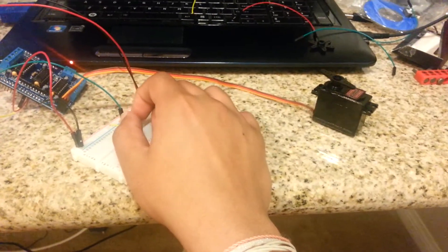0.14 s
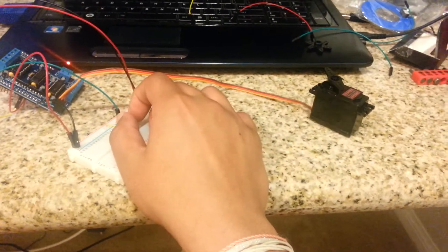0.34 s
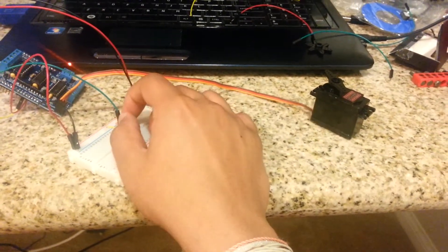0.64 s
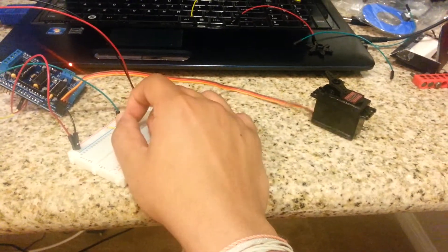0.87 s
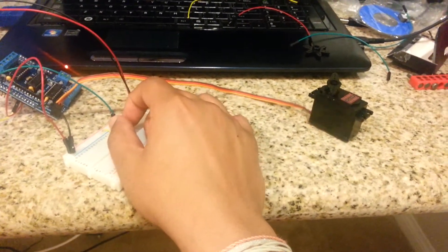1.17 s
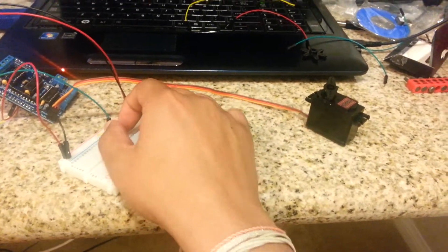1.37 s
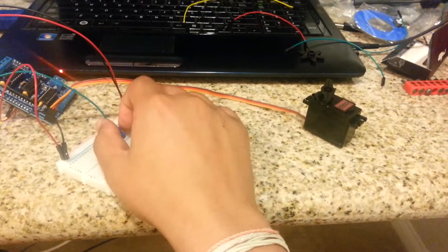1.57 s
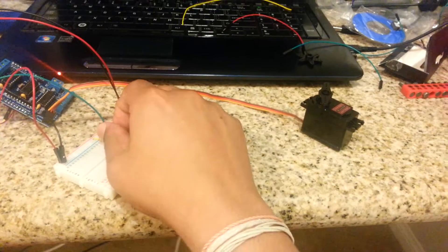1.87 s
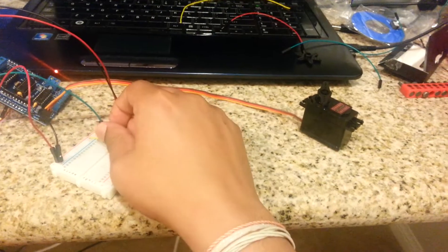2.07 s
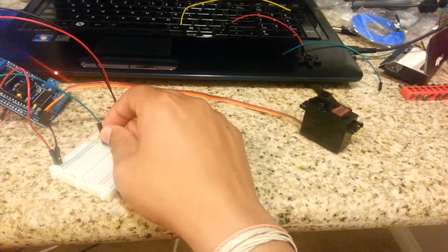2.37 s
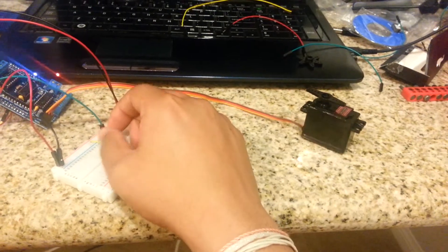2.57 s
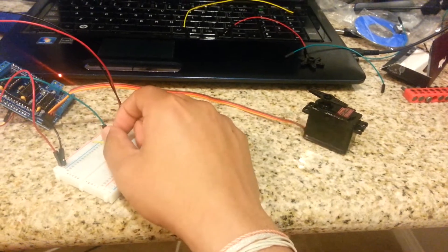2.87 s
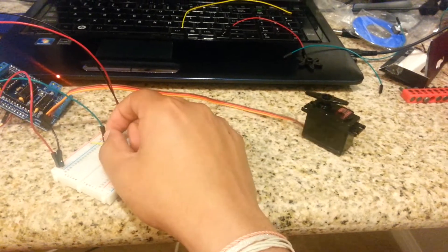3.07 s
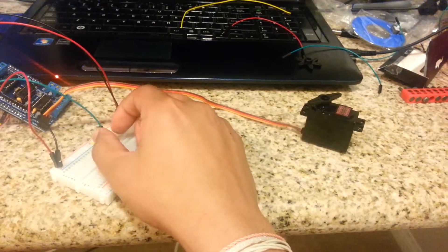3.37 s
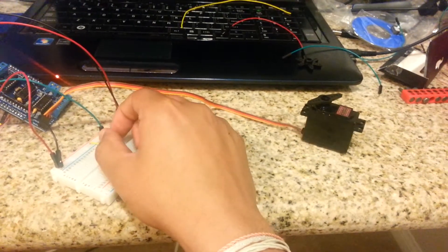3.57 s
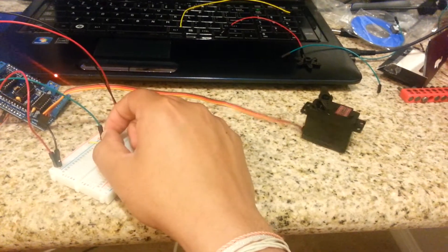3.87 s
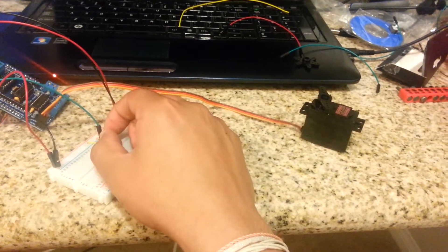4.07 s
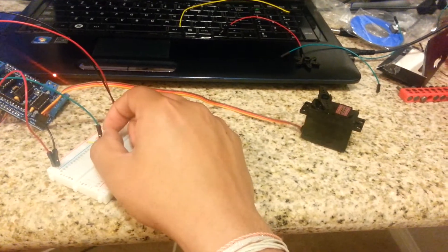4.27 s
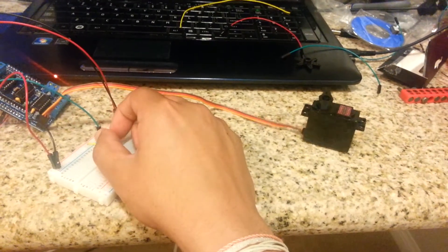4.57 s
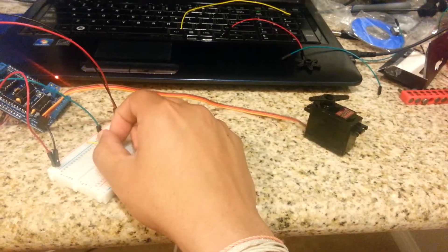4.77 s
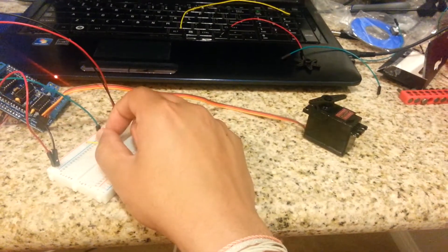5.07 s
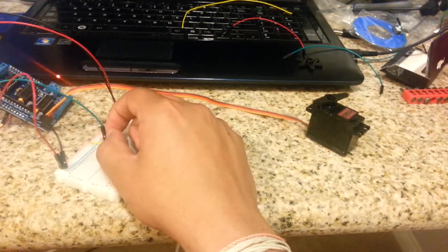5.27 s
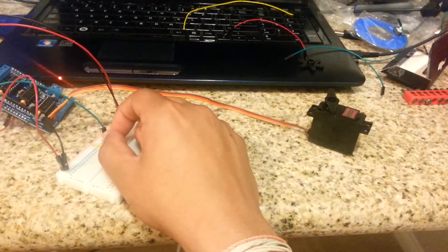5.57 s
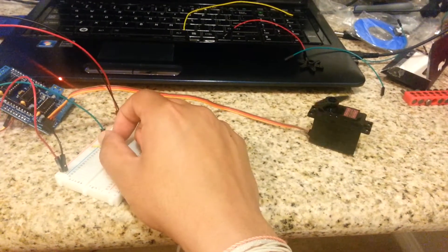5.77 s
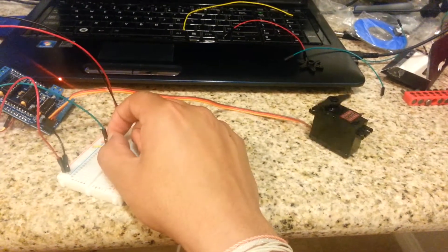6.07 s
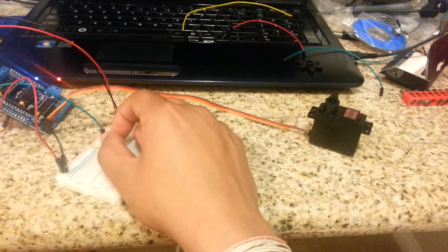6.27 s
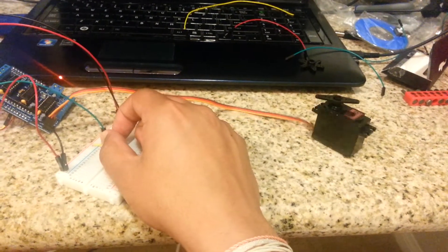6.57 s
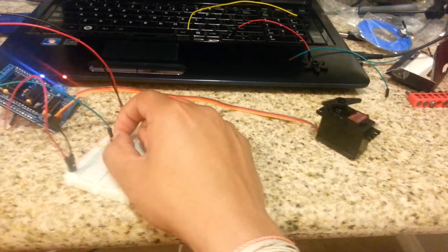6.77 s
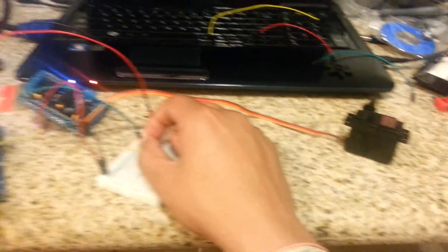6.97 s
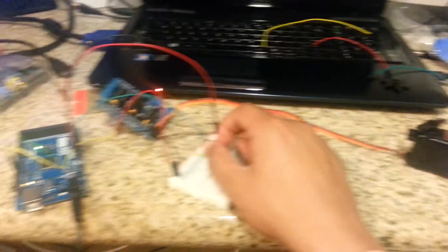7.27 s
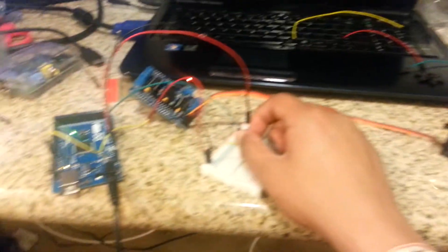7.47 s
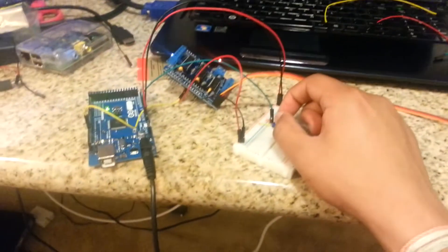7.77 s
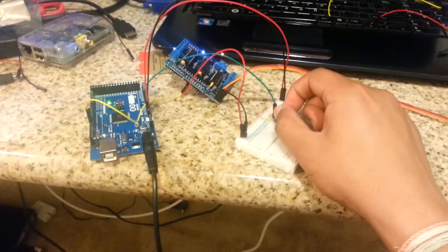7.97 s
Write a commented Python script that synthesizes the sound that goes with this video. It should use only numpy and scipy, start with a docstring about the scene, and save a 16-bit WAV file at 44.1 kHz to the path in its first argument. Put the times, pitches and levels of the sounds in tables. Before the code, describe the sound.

A small hobby servo sits close on a stone counter, right of a two-channel phone microphone. Already whirring faintly, it soon makes a dozen quick buzzing moves, each spinning up, whining through rattling plastic gears and braking. Dull ticks, faint creeping grinds and tiny case knocks fill the gaps. A steady, soft laptop fan hum lies behind in a small, dull room.

```python
"""A hobby servo, already whirring faintly, is heard first; it swings to and fro in short bursts over a fan hum.
It sits on a stone kitchen counter, close to the right of a phone with two microphone ports, in a small room.
Its motor spins up and brakes while gear teeth whine and rattle in the plastic case. Between moves, drive
pulses tick the gears and the case rocks on the stone. Behind it a laptop fan is made of shaped noise and
wavering tones. The servo is built from tooth impacts timed by the rotor and passed through case resonances."""
import sys
import numpy as np
from scipy import signal
from scipy.fft import rfft, irfft, next_fast_len
from scipy.io import wavfile
from scipy.ndimage import uniform_filter1d

SR = 44100
rng = np.random.default_rng(int(sys.argv[2]) if len(sys.argv) > 2 else 0)


def wrap_up_sound(samples):
    """Save the sound to the file named by the first command line argument, as 16-bit audio."""
    columns = np.atleast_2d(samples).T
    # keep every value between -1 and 1, then stretch to whole-number steps
    tamed = np.clip(columns, -1, 1)
    steps = np.round(tamed * 32767).astype(np.int16)
    wavfile.write(sys.argv[1], SR, steps)


N = 358533
TIME = np.arange(N) / SR

# All levels are relative, ahead of the later mix gains.
# room tone, spectral density: (f/Hz, level/dB)
AIR_COLOUR = [(15, -32), (25, -32), (109, -5.5), (293, -7), (363, -11), (404, -12), (769, -15.5), (856, -8),
              (952, -17.5), (1030, -10.5), (1150, -25.5), (1240, -18), (2370, -26.5), (10600, -33),
              (15000, -27.5)]
# laptop fan tones: (f/Hz, level/dB)
FAN_TONES = [(102.3, -88), (678.3, -79.5), (845.2, -71.5), (1017, -72), (1475, -79)]
# plastic on stone: (f/Hz, level/dB)
KNOCK_COLOUR = [(100, -22), (300, -10), (550, -9), (900, -2), (1700, 0), (3000, -6), (6000, -15),
                (15000, -32)]
# the case rocking on the stone: (t/s, peak level/dB)
KNOCKS = [(1.063, -35), (3.329, -36.5), (3.343, -41), (4.754, -29.5), (5.876, -33.5), (6.543, -33.5),
          (7.424, -32.5), (7.597, -39)]
# the dull push of one drive pulse: (f/Hz, level/dB)
PUSH_COLOUR = [(200, -26), (800, -16), (1500, 2), (2300, 0), (3300, -2), (4500, -12), (8000, -32),
               (15000, -29)]
# runs of drive pulses taking up the gear play: (start t/s, pulse count, peak level/dB, treble level/dB)
TICKS = [(0.428, 1, -31, -12), (.8875, 1, -28, -4.5), (1.1114, 1, -41.5, 12.5), (1.148, 2, -28.5, -22),
         (1.293, 1, -35.5, -1), (2.2084, 1, -34, -8), (2.9676, 1, -36, -3), (3.3669, 1, -27, -18),
         (3.5272, 1, -35.5, 3.5), (4.0239, 1, -27, -26), (4.1653, 1, -26.5, -18), (4.5057, 1, -25, -29.5),
         (4.805, 1, -27.5, 0), (5.1848, 1, -29.5, -22), (5.226, 2, -33, -27), (5.5467, 3, -28, -19),
         (6.2479, 2, -26, -20), (6.7405, 1, -18, -5), (6.987, 1, -27.5, -15), (7.0242, 2, -25.5, -22),
         (7.083, 1, -29, -27), (7.1466, 2, -29, -18), (7.1922, 1, -24.5, -5), (7.5461, 1, -26, -19),
         (7.5856, 1, -27.5, -15), (7.9087, 1, -37.5, 14)]
# slow corrections of the arm between moves: (start t/s, length t/s, effort level/dB)
CRAWLS = [(0.367, 0.17, -54.5), (0.861, 0.034, -54), (1.1, 0.11, -57), (2.576, 0.056, -43.5),
          (2.67, .035, -57.5), (3.328, 0.075, -39.5), (4.01, 0.072, -54.5), (4.172, 0.018, -50.5),
          (4.494, 0.033, -46), (4.775, .138, -47), (5.179, .075, -53), (5.58, .01, -46), (6.235, .04, -50),
          (6.622, 0.062, -40), (6.984, .1, -45), (7.151, .03, -47.5), (7.424, .085, -45), (7.57, .025, -52)]
# slow, soft tooth contact: (f/Hz, level/dB)
CREEP_COLOUR = [(200, -37), (600, -18.5), (1100, -7), (1650, 3.5), (2400, -3), (3300, 1.5), (4100, -10),
                (4900, 1.5), (6000, -16.5), (15000, -11)]
# moves of the arm: (start t/s, braking start t/s, top rotor speed f/Hz, effort level/dB, attack t/s,
# sag/dB per s, release t/s, body level/dB, bite level/dB, sizzle level/dB, whine level/dB)
MOVES = [ (-.06, 0.291, 190.4, -36.5, 0.072, -11.5, 0.071, 5, 4.5, 3.5, -37),
         (.912, 1.006, 181.8, -23, 0.019, 28, .083, 3.5, 6.5, 6.5, -25),
         (2.222, 2.405, 184.9, -27.5, 0.038, 24, 0.13, 3, 4.5, 1, -33),
         (2.967, 3.221, 197.3, -28.5, 0.034, 20.5, 0.083, 0.5, 4, 1, -25),
         (3.651, 3.878, 217.3, -28.5, .02, 26, 0.07, 0, 4.5, 1.5, -15),
         (4.525, 4.69, 220, -24, .038, 5, .092, -2, 1.5, 5, -13),
         (5.251, 5.419, 200, -28, 0.064, 25, 0.13, 1.5, 2, 1, -22),
         (5.586, 5.82, 220, -20.8, .046, 42, .073, -2, .5, 5.5, -11.5),
         (5.934, 6.151, 209, -28.5, 0.054, 13, .09, 3, 0, 0.5, -29),
         (6.285, 6.48, 219, -21, .075, 34, .082, -1, 1.5, 5, -12),
         (6.714, 6.845, 215.1, -25, 0.04, 15.5, 0.11, 5.5, 1.5, 1, -9),
         (7.168, 7.319, 218.2, -24.5, 0.07, 31, .112, 7, 4.5, 6.5, -21),
         (7.911, 8., 174.5, -29.5, 0.05, 8, .11, 9.5, 4.5, 8, -24)]
# how the case radiates: (f/Hz, level/dB)
CASE_COLOUR = [(200, -40), (550, -46.5), (800, -18), (1100, -13.5), (1450, -4.5), (2000, -4), (2500, -8),
               (3400, -3), (5200, -22.5), (6050, -22), (7300, -11.5), (9000, -11.5), (11000, -18),
               (12500, -6), (14500, -15.5)]
# its resonances: (f/Hz, width f/Hz, level/dB)
CASE_MODES = [(2783, 750, 7), (3210, 370, 5.5), (3624, 204, 7.5), (4197, 317, 11.5), (4685, 514, 15.5),
              (5123, 560, 15.5), (5637, 710, 14.5), (6510, 810, 13.5), (6750, 1170, 5), (7840, 1300, 7.5),
              (9600, 1200, 5.5)]
# tones of the running gears: (multiple of rotor speed, level/dB); 10 is the pinion's mesh, flanked by sidebands
GEAR_TONES = [(9, -8), (10, 0), (11, -10), (14, -7), (15, -5), (20, -7)]
# shading of the far microphone port: (f/Hz, level/dB)
PORT_SHADE = [(300, -5.5), (900, -13.5), (1500, -24), (4400, -28), (7000, -25.5), (10000, -15.5),
              (14000, -20)]

DRIVE_HZ = 49.5
HOLDING_DB = -68  # effort of holding still
TAKE_UP_S = .011  # the gear play closes just before the start
# effort at the start and after the release time; braking bites gradually
ONSET_DB, RELEASE_DB, RELEASE_CURVE = -17.5, -22, 1.97
CRAWL_ATTACK_S, CRAWL_RELEASE_S = .012, .023
STRAY_DB, STRAY_SCATTER_DB = 5.5, 4.5  # faint crawl pulses: level above the effort, spread
AIR_DB, AIR_WANDER_DB = -53, 1.3
TOP_HZ = 14750  # upper edge of the microphone path


def undb(db):
    """Decibels to gain."""
    return 10 ** (np.asarray(db) / 20)


def unit(x):
    """Scale to rms 1."""
    return x / np.sqrt(np.mean(x ** 2))


def walk(rate):
    """Smooth random wander with a spread near 1."""
    k = int(SR / rate)
    steps = np.repeat(rng.standard_normal(N // k + 1), k)
    return 1.3 * uniform_filter1d(uniform_filter1d(steps, k), k)[:N]


def response(points, modes=(), size=4096):
    """Causal impulse response of a (Hz, dB) outline with resonances on top."""
    f = np.arange(size // 2 + 1) * SR / size + 1
    hz, outline_db = np.transpose(points)
    db = np.interp(np.log(f), np.log(hz), outline_db)
    db = db + sum(peak / (1 + (2 * (f - centre) / width) ** 2) for centre, width, peak in modes)
    # folding the cepstrum gives minimum phase
    cepstrum = irfft(np.log(undb(db)))
    cepstrum[1:size // 2] *= 2
    cepstrum[size // 2 + 1:] = 0
    return irfft(np.exp(rfft(cepstrum)))


def ring(x, impulse):
    """Pass a sound through an impulse response."""
    return signal.fftconvolve(x, impulse)[:N]


def band(x, hz, kind):
    """Gentle low-pass or high-pass."""
    return signal.sosfilt(signal.butter(2, min(hz, SR / 2 - 1), kind, fs=SR, output="sos"), x)


def below(x, hz):
    """The part of a sound below a frequency, without delay."""
    return signal.sosfiltfilt(signal.butter(4, hz, fs=SR, output="sos"), x)


def clicks(times, sizes):
    """Impulses at the given times."""
    out = np.zeros(N)
    np.add.at(out, np.clip(np.round(times * SR).astype(int), 0, N - 1), sizes)
    return out


def room_tone():
    """Fan air and wavering fan tones, partly shared by both microphone ports."""
    shared = rng.standard_normal(N)
    air = np.array([unit(ring(.43 * shared + rng.standard_normal(N), response(AIR_COLOUR)))
                    for _ in range(2)])
    hum = np.zeros(N)
    for hz, db in FAN_TONES:
        level = undb(db + .47 * walk(9)) * np.sqrt(2)
        turns = np.cumsum(hz + 4 * walk(25)) / SR
        hum += level * np.sin(2 * np.pi * turns)
    port_gains = undb([[1.2], [-1.5]])
    return (air * undb(AIR_DB + AIR_WANDER_DB * walk(4.92)) + undb(1.5) * hum) * port_gains


def tail(t60):
    """Dense decaying reflections of unit energy."""
    t = TIME[:SR // 2]
    h = rng.standard_normal(len(t)) * undb(-60 * t / t60) * (1 - np.exp(-t / .001))
    return h / np.linalg.norm(h)


def glance(x, delay_s=.0007064, swing=.34):
    """A near reflection whose path keeps changing as arm, hand and phone move."""
    return np.interp(TIME - delay_s * (1 + swing * walk(3)), TIME, x)


def disperse(x, spread_s=.0012):
    """Bending waves smear a blow: the treble crosses the case first, the lows later."""
    size = next_fast_len(N + SR // 10)
    f = np.arange(size // 2 + 1) * SR / size
    phase = 4 * np.pi * spread_s * np.sqrt(3000 * f)
    return irfft(rfft(x, size) * np.exp(-1j * phase), size)[:N]


def knocks():
    """The recoil tips the case, which chatters briefly on the stone."""
    out = np.zeros(N)
    for s, peak_db in KNOCKS:
        blow = signal.fftconvolve(response(KNOCK_COLOUR), tail(.19))
        out += ring(clicks(np.array([s]), undb(peak_db)), blow / abs(blow).max())
    return undb(.5) * out


def crawl_effort():
    """Each correction swells quickly, holds and dies away."""
    out = np.zeros(N)
    for start, length, db in CRAWLS:
        swelling = np.minimum(TIME - start, 0) / CRAWL_ATTACK_S
        dying = np.maximum(TIME - start - length, 0) / CRAWL_RELEASE_S
        out += undb(db) * np.exp(swelling - dying)
    return out


def stray_pulses():
    """During a crawl each drive pulse catches the gears with a strength of its own."""
    s = np.arange(0, TIME[-1], 1 / DRIVE_HZ)
    scatter = np.clip(rng.standard_normal(len(s)), -2, 2)
    return clicks(s, undb(STRAY_DB + STRAY_SCATTER_DB * scatter)) * crawl_effort()


def ticks():
    """Drive pulses, single, in short runs or stray, tick dully; brighter ones also ring the case."""
    pulses = [(start + k / DRIVE_HZ, peak, treble)
              for start, count, peak, treble in TICKS for k in range(round(count))]
    s, peak_db, treble_db = np.transpose(pulses)
    push, case = response(PUSH_COLOUR), response(CASE_COLOUR, CASE_MODES)
    dull = ring(clicks(s, undb(peak_db)) + stray_pulses(), push / abs(push).max())
    bright = ring(clicks(s, undb(peak_db + treble_db)), case / abs(case).max())
    return band(undb(-2.5) * dull + undb(-1.5) * disperse(bright), 9000, "low")


def per_move(column):
    """Hold each move's value until the next move begins."""
    starts = np.array(MOVES)[:, 0]
    return column[np.maximum(np.searchsorted(starts, TIME) - 1, 0)]


def rotor_speed(spin_up=.052, coasting=1.15, creep_hz=55):
    """The rotor nears its top speed exponentially, brakes near the goal, and creeps between moves."""
    hz = np.full(N, 1. * creep_hz)
    for start, brake, top_hz, _, _, _, release, *_ in MOVES:
        rise = 1 - np.exp(-np.maximum(TIME - start, 0) / spin_up)
        slowing = np.exp(-(np.maximum(TIME - brake, 0) / (coasting * release)) ** 2)
        hz = np.maximum(hz, top_hz * rise * slowing)
    return hz


def move_effort():
    """Effort climbs as the motor starts, sags as the arm gets going and falls away under braking."""
    out = np.zeros(N)
    for start, brake, _, effort_db, attack, sag, release, *_ in MOVES:
        engaged = np.exp(np.minimum(TIME - start, 0) / TAKE_UP_S)
        rising = np.clip(1 - (TIME - start) / attack, 0, 1)
        braking = np.maximum(TIME - brake, 0) / release
        sag_db = sag * np.clip(TIME - start - attack, 0, brake - start)  # a negative sag climbs
        level_db = effort_db + ONSET_DB * rising - sag_db + RELEASE_DB * braking ** RELEASE_CURVE
        out += engaged * undb(level_db)
    return out


def impacts(turns, count, slop, scatter_db, wear_db):
    """Blows repeated count times a turn: each tooth has its own size, each blow its own slop."""
    chance = rng.standard_normal((N // 8, 2))
    wear = rng.standard_normal(count)
    k = np.arange(int(turns[-1] * count))
    times = np.interp((k + slop * chance[k, 0]) / count, turns, TIME)
    sizes = undb(scatter_db * np.clip(chance[k, 1], -2, 2) + wear_db * wear[k % count])
    return unit(clicks(times, sizes))


def whine(turns, running, resonance_hz=2070, width_hz=260):
    """Mesh tones glide with the rotor and swell as they meet a case resonance."""
    angle = 2 * np.pi * turns
    tones = sum(undb(db + 1.5 * walk(40)) * np.sin(order * angle) for order, db in GEAR_TONES)
    mesh_hz = 10 * np.gradient(turns) * SR
    swell = .55 + .75 / (1 + (2 * (mesh_hz - resonance_hz) / width_hz) ** 2)
    # near full speed the fourth order sings too
    fourth = undb(-20) * running ** 16 * np.sin(4 * angle)
    return tones * swell * running ** 3 + fourth


def gears():
    """A ten-tooth pinion and the next stage rattle the case; one harder snap comes each turn."""
    body, bite, sizzle, mesh = (per_move(undb(db)) for db in np.transpose(MOVES)[-4:])
    hz = rotor_speed() * (1 + .004 * walk(60))
    turns = np.cumsum(hz) / SR
    running = np.clip(hz / 200, 0, 1)
    teeth = impacts(turns, count=10, slop=.27, scatter_db=3, wear_db=2.5)
    second_stage = impacts(turns * .21, count=12, slop=.25, scatter_db=2, wear_db=2)
    snap = impacts(turns, count=1, slop=.008, scatter_db=4.5, wear_db=0)
    force = disperse(teeth + undb(-6.5) * second_stage)
    force = force + undb(-9.5) * running ** 2 * snap
    force = force + undb(-3) * rng.standard_normal(N)
    # the drive is refreshed about 50 times a second, so the torque throbs, most of all at low speed
    throb = np.cos(2 * np.pi * DRIVE_HZ * TIME + walk(8))
    force = force * undb((5 - 5.4 * running) * throb + 1.26 * walk(90))
    case = unit(ring(force, response(CASE_COLOUR, CASE_MODES)))
    # load and direction press different tooth flanks together, which colours each move
    low, middle, high = (below(case, edge_hz) for edge_hz in (1500, 5000, 11000))
    case = body * low + (middle - low) + bite * (high - middle) + sizzle * (case - high)
    # at a crawl single teeth slip over each other
    slips = impacts(turns, count=2, slop=.35, scatter_db=3, wear_db=-3)
    creep = unit(ring(force + 2 * slips, response(CREEP_COLOUR)))
    effort = np.maximum(move_effort(), crawl_effort()) + undb(HOLDING_DB)
    rattle = undb(-2) * (.37 + .47 * running) * case
    crawl = undb(1.5) * (1 - running) ** 2 * creep
    return effort * (rattle + crawl + mesh * whine(turns, running))


def scene():
    """The servo faces the right port; counter, laptop and a soft, dull room reverberation reflect it."""
    servo = undb(7) * (gears() + ticks() + knocks())
    right = servo + undb(-8.5) * glance(servo) + undb(-19) * ring(servo, tail(.11))
    shaded = undb(5) * ring(servo, response(PORT_SHADE))
    # the left channel leads by a few samples and hears more scattered sound
    direct = np.roll(shaded, -3)
    left = direct + undb(-29) * glance(shaded) + undb(6.5) * ring(shaded, tail(.12))
    soft = band(servo, 5500, "low")
    room = np.array([ring(soft, tail(.13)) for _ in range(2)])
    # the low rumble dips while the servo is loud
    loudness = uniform_filter1d(abs(servo), SR // 40)
    air = room_tone()
    air = air - below(air, 256) * loudness / np.hypot(loudness, undb(-30))
    return undb(-1) * np.array([left, right]) + undb(-26) * room + air


def record(dry):
    """The phone rounds the highest peaks and cuts the top."""
    rounded = np.tanh(1.3 * dry) / 1.3
    return signal.sosfilt(signal.ellip(14, .2, 80, TOP_HZ, fs=SR, output="sos"), rounded)


dry = scene()
out = record(dry)
wrap_up_sound(out)
```